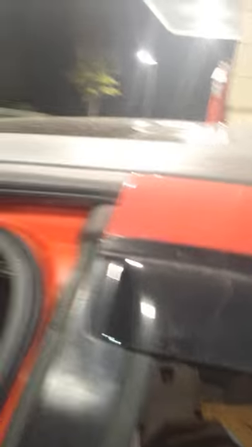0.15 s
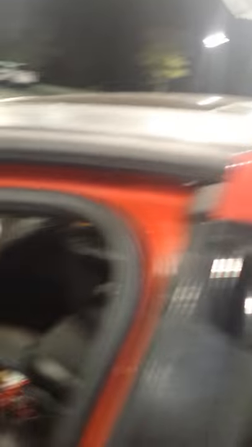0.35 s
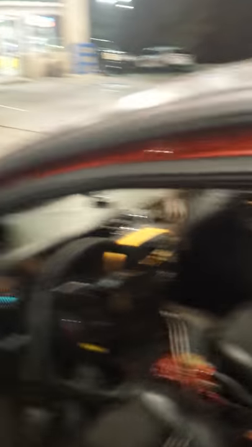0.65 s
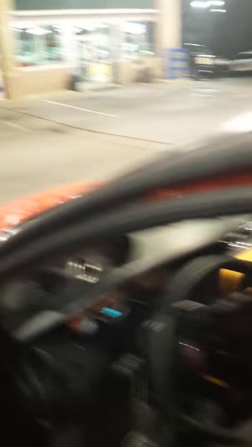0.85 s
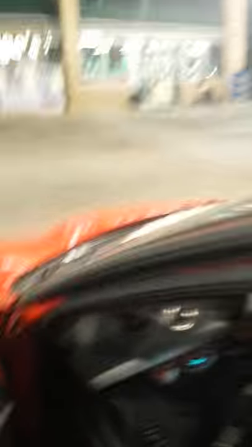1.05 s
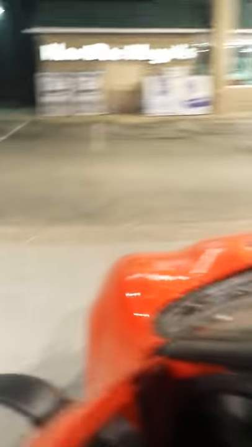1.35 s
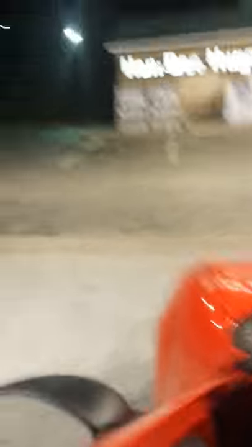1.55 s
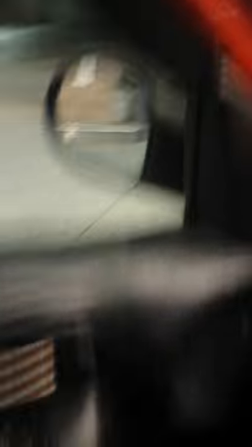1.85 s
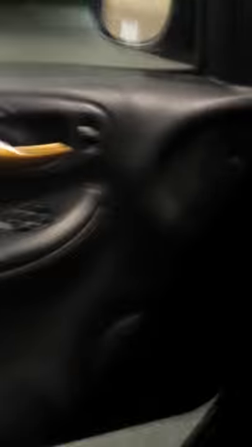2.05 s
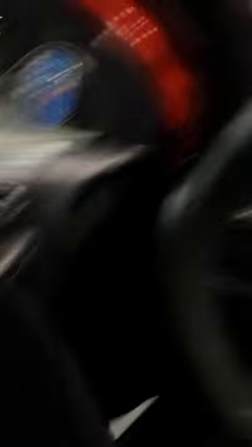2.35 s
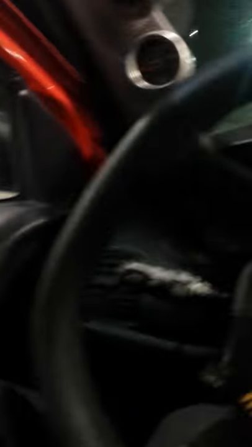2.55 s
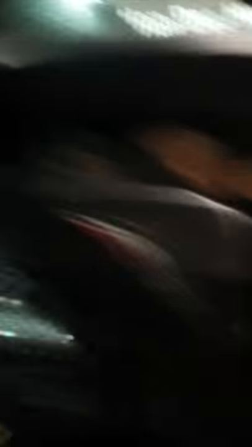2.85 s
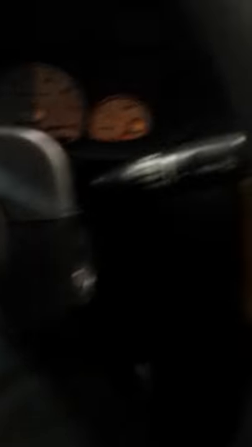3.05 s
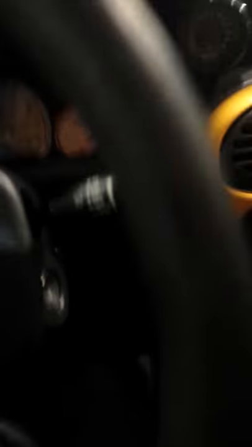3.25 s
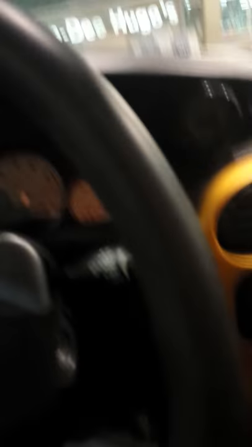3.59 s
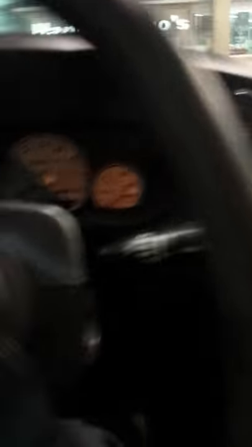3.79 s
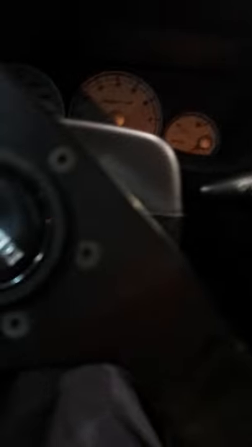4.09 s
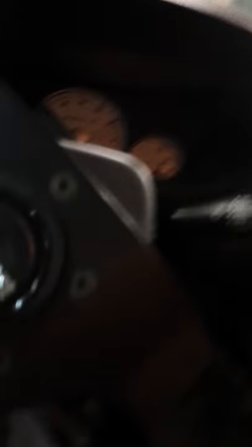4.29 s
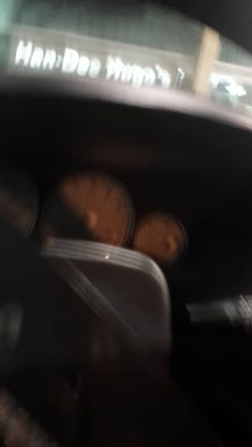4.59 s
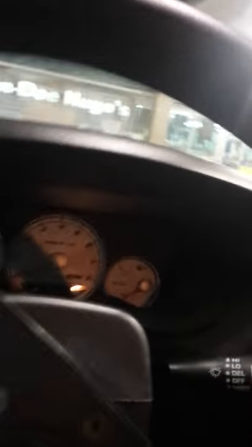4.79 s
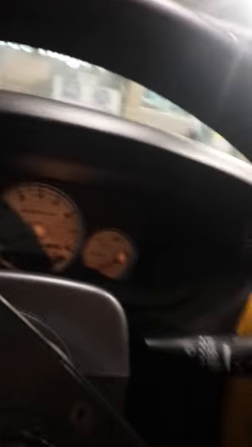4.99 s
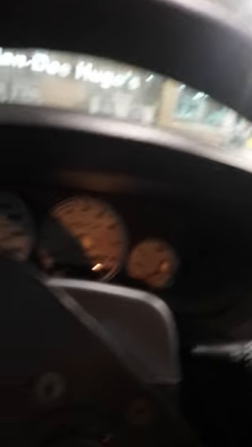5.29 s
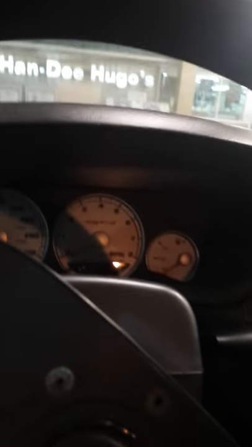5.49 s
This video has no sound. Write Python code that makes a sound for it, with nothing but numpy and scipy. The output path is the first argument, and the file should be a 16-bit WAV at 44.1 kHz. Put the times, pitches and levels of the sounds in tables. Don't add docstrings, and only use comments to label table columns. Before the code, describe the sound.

On a quiet forecourt at night, a car handle clunks open near the microphone. Air rumble, faint distant traffic and cloth rustle accompany climbing in. A loud, bright snap with a short rattle comes midway, then scattered clicks, and the door slams with a deep thump and rattling bounce. Trim buzzes briefly, the cabin goes hushed, and fingers tick and pop on the recorder.

```python
import sys
import numpy as np
from scipy import signal
from scipy.io import wavfile

SR = 44100
rng = np.random.default_rng(int(sys.argv[2]) if len(sys.argv) > 2 else 0)


def materialize(psi):
    bounded = np.clip(np.atleast_2d(psi).T, -1, 1)
    quanta = np.round(bounded * 32767).astype(np.int16)
    wavfile.write(sys.argv[1], SR, quanta)


def linear_from_db(decibels):
    return 10 ** (np.asarray(decibels, float) / 20)


N = 248283


def rms_one(x):
    return x / np.sqrt(np.mean(x ** 2) + 1e-20)


def in_time(rows):
    s, *columns = np.transpose(rows)
    return [np.interp(np.arange(N) / SR, s, c) for c in columns]


def gate(rows):
    t0, t1 = rows[0][0], rows[-1][0]
    return np.interp(np.arange(N) / SR, [t0, t0 + 0.0038, t1 - 0.003, t1], [0, 1, 1, 0])


def at_hz(points, hz):
    curve_hz, values = np.array(points)[:, 0], np.array(points)[:, 1]
    return np.interp(np.log(hz), np.log(curve_hz), values)


def sides(pan_db):
    g = linear_from_db(pan_db)
    return np.array([2 * g / (1 + g), 2 / (1 + g)])


def filtered(x, order, hz, kind="low"):
    return signal.sosfilt(signal.butter(order, hz, kind, fs=SR, output="sos"), x)


def drift(rate):
    r = np.exp(-80 * np.pi * rate / SR)
    noise = rng.standard_normal(N // 40 + 2002)
    slow = signal.lfilter([1], [1, -2 * r, r * r], noise)[2000:]
    return np.interp(np.arange(N) / 40, np.arange(len(slow)), rms_one(slow))


def resonance(x, hz, width):
    r = np.exp(-np.pi * width / SR)
    poles = [1, -2 * r * np.cos(2 * np.pi * hz / SR), r * r]
    return signal.lfilter([(1 - r * r) / 2, 0, (r * r - 1) / 2], poles, x)


def grains(per_s, spread_db):
    strength = linear_from_db(spread_db * np.minimum(rng.exponential(1, (2, N)), 5))
    sign = rng.choice([-1, 1], (2, N))
    return strength * sign * (rng.random((2, N)) < per_s / SR) + 1e-9


def coloured(source, spectrum, patchy_db, inside=None):
    # f/Hz, likeness (-1 to 1)
    likeness = [(60, 0.8), (240, 0.86), (950, 0.01), (3770, -0.13), (15000, 0.033)]
    inside = spectrum if inside is None else inside
    out, together = 0, drift(7.1)
    shut = np.interp(np.arange(N) / SR, [3.9, 4.8], [0, 1])
    bottom, top = spectrum[0][0], spectrum[-1][0]
    edges = bottom * 2 ** np.arange(0, np.log2(top / bottom) + 0.3, 0.5)
    for k, (low, high) in enumerate(zip(edges, np.minimum(edges[1:], 0.45 * SR))):
        shifted = np.roll(source, 5000 * (k % 2), axis=1)
        mid, side = filtered(shifted, 2, [low, high], "band")
        hz = np.sqrt(low * high)
        alike = np.clip(at_hz(likeness, hz), -1, 1)
        level_db = (1 - shut) * at_hz(spectrum, hz) + shut * at_hz(inside, hz)
        gain = linear_from_db(level_db + patchy_db * (0.84 * together + 0.28 * drift(8.3)))
        out = out + gain * (np.sqrt(1 + alike) * mid + np.sqrt(1 - alike) * side * [[1], [-1]])
    return rms_one(out)


def add(out, s, burst):
    at = round(s * SR)
    out[:, at:at + burst.shape[1]] += burst[:, :N - at]


def clicks(rows, broad_db, alike, body_hz, swell, presence=2.4, spike=0.66, spike_s=0.0042,
           width=0.19, cut_hz=10500):
    out, t = np.zeros((2, N)), np.arange(8192) / SR
    noises = rng.standard_normal((len(rows), 2, len(t)))
    for (s, peak_db, hz, t60, pan_db), (mid, side) in zip(rows, noises):
        dying = linear_from_db(-60 * np.maximum(t - swell, 0) / max(t60, 0.002))
        shape = np.minimum(t / swell, 1) ** 2 * dying
        shape = shape * (1 + spike * np.exp(-np.abs(t - swell) / spike_s))
        pair = (alike * mid + (1 - alike) * side * [[1], [-1]]) * shape
        body = resonance(pair, body_hz, 3.24 * body_hz)
        microphone = 0.93 * resonance(pair, 5650, 1170) + 0.39 * resonance(pair, 4200, 1300)
        wide = body + presence * microphone
        burst = filtered(resonance(pair, hz, width * hz) + linear_from_db(broad_db) * wide, 3, cut_hz)
        level = linear_from_db(peak_db) / np.abs(burst.mean(0)).max()
        add(out, s - swell, level * sides(pan_db)[:, None] * burst)
    return out


def knocks(rows, soft_cycles):
    out, t = np.zeros((2, N)), np.arange(16384) / SR
    noises = rng.standard_normal((len(rows), len(t)))
    for (s, peak_db, hz, t60, pan_db, rough), noise in zip(rows, noises):
        shape = (1 - np.exp(-t * hz / soft_cycles)) * linear_from_db(-60 * t / max(t60, 0.004))
        shaken = rms_one(resonance(resonance(noise, hz, 0.26 * hz), hz, 2.4 * hz))
        burst = shape * ((1 - rough) * np.sin(2 * np.pi * hz * t) + rough * shaken)
        add(out, s, linear_from_db(peak_db) * sides(pan_db)[:, None] * burst / np.abs(burst).max())
    return out


def surroundings():
    # f/Hz, level/dB (per Hz)
    rumble_colour = [(15, -57), (25, -16.5), (108, 3), (167, -5), (220, -2), (285, -10.5), (340, -11),
                     (440, -26), (750, -120)]
    traffic_colour = [(150, -46), (250, -3.5), (548, -7), (897, -7.5), (2250, -18), (2400, -23),
                      (3120, -46.5), (5280, -120)]
    rustle_colour = [(1000, -22), (1700, -5), (2930, -11), (3310, 0), (4550, -1), (6880, 3), (11300, -20),
                     (14400, -2.5), (16000, -32)]
    rustle_colour_inside = [(1000, -65.5), (1700, -37), (2380, -5), (3310, -6), (7210, 6), (14700, -26.5),
                            (16000, -33)]
    # t/s, level/dB
    openness = [(0.0, -45.5), (0.41, -45), (1.14, -45), (1.93, -40.5), (2.18, -41), (2.39, -54),
                (2.8, -58.5), (3.22, -45.5), (3.4, -47.5), (3.93, -55), (4.11, -67.5), (4.48, -57.5),
                (4.74, -53.5), (5.29, -62), (5.63, -56)]
    # t/s, level/dB
    movement = [(0.0, -53), (0.12, -40), (0.41, -40), (0.52, -50.5), (1.14, -43), (1.5, -38), (2.18, -37.5),
                (2.39, -45.5), (2.67, -49), (3.11, -47.5), (3.25, -31), (3.38, -40.5), (3.93, -49.5),
                (4.1, -61.5), (4.74, -52), (5.04, -50.5), (5.19, -58.5), (5.46, -45)]
    # t/s, left-right level/dB
    facing = [(0.15, -3), (1.2, 2.5), (1.5, 10.5), (3.3, 2), (4.05, 10), (4.12, 13), (4.48, -14),
              (4.54, -20), (4.8, -11)]
    (traffic_db,), (rustle_db,), (pan_db,) = in_time(openness), in_time(movement), in_time(facing)
    start, edge_s, gust_peak_db = 0.0084, 0.094, 7.5
    end = start + 0.54
    gust_db, = in_time([(start, 0), (start + edge_s, gust_peak_db), (end - edge_s, gust_peak_db), (end, 0)])
    rumble_db = -45 + 0.93 * (traffic_db + 48.5) + gust_db
    rustle_db = rustle_db + 0.82 * drift(4.7)
    rumble = linear_from_db(rumble_db) * coloured(rng.standard_normal((2, N)), rumble_colour, patchy_db=3.5)
    traffic = linear_from_db(traffic_db) * coloured(rng.standard_normal((2, N)), traffic_colour, patchy_db=2.0)
    cloth = coloured(grains(9000, 3.1), rustle_colour, patchy_db=1.8, inside=rustle_colour_inside)
    return rumble + (traffic + linear_from_db(rustle_db) * cloth) * sides(np.clip(0.29 * pan_db, -9, 9))


def self_noise():
    return linear_from_db(-60) * rms_one(filtered(rng.standard_normal((2, N)), 1, 5200, "high"))


def sleeve():
    # t/s, level/dB
    swish = [
        (0.0, -60.5),
        (0.302, -50),
        (0.422, -54),
        (0.55, -89),
    ]
    airy = filtered(rng.standard_normal((2, N)), 2, [9500, 15800], "band")
    return gate(swish) * linear_from_db(in_time(swish)[0] + 4.5) * rms_one(airy)


def thuds():
    # t/s, peak level/dB, pitch f/Hz, decay t60/s, left-right level/dB
    dull_knocks = [(0.132, -21, 94, 0.14, -19), (0.292, -21.5, 503, 0.24, 3), (0.306, -17, 376, 0.13, 7),
                   (0.3, -14.5, 286, 0.13, 3.5), (0.691, -25, 1100, 0.04, 22),
                   (0.803, -28.5, 114, 0.31, 2.5), (1.243, -29, 228, 0.19, 3.5),
                   (1.692, -24.5, 850, 0.093, 24), (1.75, -21.5, 129.6, 0.21, 9),
                   (1.77, -14.5, 131, 0.063, 5), (1.799, -23, 172, 0.14, 5), (1.863, -15.5, 115, 0.077, 31),
                   (2.058, -16, 930, 0.078, -12), (2.066, -33, 1100, 0.17, -4),
                   (2.184, -24, 101, 0.22, -33), (2.277, -19, 166.6, 0.24, 2.5),
                   (2.93, -30.5, 193, 0.072, 2.5), (2.943, -33, 382, 0.047, 6),
                   (3.077, -16, 508, 0.079, 10), (3.099, -18, 326, 0.25, 16),
                   (3.507, -29.5, 93, 0.049, -31), (3.553, -33.5, 112.3, 0.09, -28),
                   (4.84, -38.5, 233, 0.078, 6), (4.885, -32.5, 226, 0.06, 5)]
    rough_clunks = [(0.297, -21.5, 784, 0.15, 14), (0.315, -25.5, 740, 0.19, 7),
                    (0.693, -27, 926, 0.049, -2), (0.802, -30, 492, 0.083, 3), (1.754, -25, 410, 0.055, 7),
                    (2.284, -27, 433, 0.046, -15), (3.147, -16, 487, 0.13, 10),
                    (3.166, -28, 664, 0.081, 9.5), (3.211, -18, 453, 0.062, 10),
                    (3.287, -36, 610, 0.054, 3), (0.692, -29, 517, .05, 5), (2.057, -21, 560, .06, 9),
                    (2.069, -18.5, 1060, 0.05, -5), (2.082, -31, 994, 0.046, -7.5),
                    (2.108, -25.5, 1005, 0.13, -4), (4.477, -27.5, 800, 0.019, -20),
                    (4.785, -41, 280, 0.044, 13)]
    blows = [(*row, 0.42) for row in dull_knocks] + [(*row, 0.67) for row in rough_clunks]
    return knocks(blows, soft_cycles=0.15)


def hard_contacts():
    # t/s, peak level/dB, colour f/Hz, decay t60/s, left-right level/dB
    cracks = [(0.140, -27, 13000, 0.033, -12), (0.691, -32.5, 2600, 0.059, 9), (0.694, -30.5, 4340, .04, 4),
              (1.529, -28, 6500, .03, 10), (1.5366, -16.5, 6800, 0.023, 19), (1.692, -30, 6430, 0.18, 6),
              (2.052, -8, 6000, .06, -4), (2.0555, 2, 4500, 0.041, 7), (2.0565, -10, 2700, .07, 7),
              (2.065, -25, 7060, 0.051, 2), (2.1035, -6, 6370, .012, -4), (2.1083, -12, 7150, .012, -4),
              (2.1432, -17, 7100, .015, 1), (3.111, -16.5, 1610, .04, -6), (3.152, -26, 1610, .05, 5),
              (3.1985, -15.5, 3280, .06, 7), (3.2005, -12, 7000, .05, -2), (3.211, -14.5, 6000, .04, 2),
              (3.2125, -18.5, 3300, 0.065, 2), (3.2225, -18, 3320, .08, 8), (3.124, -19, 4800, .05, -1),
              (3.172, -15, 3000, 0.074, 5), (3.223, -20, 7000, 0.033, 0), (3.26, -25, 6900, .06, -3),
              (3.274, -21, 6000, .04, 1), (3.286, -29, 2000, .04, 6), (3.2985, -28, 3450, .05, 5),
              (1.10, -36, 5000, 0.17, 0), (2.565, -42, 5000, .2, 2), (2.6945, -37, 5200, 0.027, 3),
              (2.9745, -30, 5500, .03, 1), (3.0795, -22, 6500, .15, 3), (3.086, -23.5, 3500, 0.11, 5),
              (5.025, -38.5, 5000, 0.17, -3), (5.2815, -26, 7000, .03, -4)]
    return clicks(cracks, broad_db=-34, alike=0.69, body_hz=3000, swell=0.0003, presence=1.0,
                  spike=1.3, spike_s=0.00051, width=0.2, cut_hz=10000)


def latch_and_keys():
    # t/s, peak level/dB, decay t60/s, left-right level/dB
    latch_snaps = [
        (0.2933, -9, 0.089, 7.5),
        (0.6932, -35, 0.072, 19),
        (3.213, -18, 0.08, 4),
        (3.1985, -13.5, 0.15, 3),
    ]
    key_clicks = [(1.3099, -30, 0.13, 8), (1.8336, -22, 0.0098, 10), (2.0562, 0, 0.039, 1),
                  (2.3479, -29.5, 0.085, 2), (2.4057, -26.5, 0.42, 2.5), (2.445, -30, 0.07, 0),
                  (2.6943, -34, 0.04, 1), (2.8207, -28, 0.072, 0), (2.9312, -34.5, 0.047, 2),
                  (2.9734, -33.5, 0.061, -4), (3.0794, -22, 0.1, 3), (3.0994, -10.5, 0.38, -1),
                  (3.1656, -15, 0.17, 1), (3.3727, -23, 0.11, -1), (3.4237, -29, 0.053, -4),
                  (3.4674, -30.5, 0.04, 3), (3.5098, -27.5, 0.074, 1), (3.5892, -26, 0.077, 1),
                  (3.6334, -27.5, 0.11, 3), (4.8718, -32, 0.027, 9), (5.335, -39, 0.057, -1)]
    snaps = [(s, db, 3200, t60, pan_db) for s, db, t60, pan_db in latch_snaps]
    snaps += [(s, db, 6340, t60, pan_db) for s, db, t60, pan_db in key_clicks]
    return clicks(sorted(snaps), broad_db=-12.5, alike=0.47, body_hz=1100, swell=0.0023)


def loose_parts():
    # t/s, peak level/dB, colour f/Hz, decay t60/s, left-right level/dB
    chatter = [(0.4086, -35, 7040, 0.069, -7), (1.592, -26.5, 5950, 0.42, 21), (1.9885, -25, 6600, 0.2, -2),
               (2.1035, -6.5, 6150, 0.09, 2), (2.1432, -15, 6460, 0.24, -0.5),
               (3.1226, -15.5, 5750, 0.17, 6), (3.218, -14, 6800, 0.044, -5),
               (3.2988, -20.5, 6400, 0.15, -2), (3.3365, -13, 6030, 0.073, 2),
               (3.385, -29, 6740, 0.098, 12), (3.7722, -31.5, 4740, 0.056, 3),
               (4.8934, -22, 7340, 0.077, -4), (5.281, -27.5, 7000, 0.1, 0)]
    return clicks(chatter, broad_db=-13.5, alike=0.46, body_hz=1700, swell=0.011)


def hinge():
    # t/s, peak level/dB, pitch f/Hz, decay t60/s
    squeaks = [
        (1.874, -20, 12300, .03),
        (1.885, -12, 12600, 0.023),
        (4.741, -57, 1200, .6),
        (4.80, -53.5, 1160, 0.34),
    ]
    out, t = np.zeros((2, N)), np.arange(6000) / SR
    for s, peak_db, hz, t60 in squeaks:
        wobble = 0.33 * np.cumsum(rng.standard_normal(len(t))) * hz / SR
        shape = (1 - np.exp(-t / 0.0047)) * linear_from_db(peak_db - 60 * t / t60) * (1 - t / t[-1])
        tone = np.sin(2 * np.pi * hz * t + wobble) * shape
        add(out, s, tone * sides(7.0)[:, None])
    return out


def door():
    # t/s, rattle level/dB
    bounces = [
        (3.079, -23),
        (3.099, -13),
        (3.125, -40),
        (3.164, -16.5),
        (3.197, -26.5),
        (3.218, -38),
        (3.283, -22.5),
    ]
    # t/s, peak level/dB, pitch f/Hz, decay t60/s
    air_pushes = [
        (3.105, -17.5, 61, 0.35),
        (3.127, -17, 130, 0.091),
        (3.1478, -3.5, 120, 0.04),
        (3.156, -20, 57.5, 0.44),
        (3.177, -7, 120, 0.14),
        (3.223, -21, 128.6, 0.28),
        (3.1634, -10.5, 95, 0.03),
    ]
    # f/Hz, width/Hz, level/dB
    panel_modes = [(326, 99, -1), (480, 75, -0.5), (690, 39, -5.5), (1200, 72, -8), (1600, 580, -17.5)]
    # f/Hz, level/dB (per Hz)
    rattle_colour = [(880, -45), (1500, 1.5), (1870, -6), (3310, 3), (4970, -12), (7030, -18), (8400, -20),
                     (14500, -20), (16000, -35)]
    attack_s, t60_s = 0.0013, 0.1
    settle_db, settle_t60_s = -11, 0.71
    t, power = np.arange(0, N, 32) / SR, 0
    for s, db in bounces:
        since = np.maximum(t - s, 0)
        fast = linear_from_db(db - 60 * since / t60_s)
        shiver = linear_from_db(db + settle_db - 60 * since / settle_t60_s)
        power = power + np.minimum(since / attack_s, 1) ** 2 * (fast ** 2 + shiver ** 2)
    panel_curve_db = 6 - 18.5 * (t - bounces[0][0])
    shake, panel_db = in_time(np.transpose([t, np.sqrt(power), panel_curve_db]))
    jolts = filtered(grains(670, 4.3), 2, 1800)
    panel = 0
    for k, (hz, width, db) in enumerate(panel_modes):
        panel = panel + linear_from_db(db) * resonance(jolts, hz, 2.56 * width) * (-1) ** k
    panel = panel[0] + 0.63 * panel[1] * [[1], [-1]]
    rattle = coloured(grains(500, 3.6), rattle_colour, patchy_db=4.5)
    shaking = linear_from_db(panel_db - 4.0) * rms_one(panel) + linear_from_db(-3.5) * rattle
    booms = [(*row, 1.2, 0.16) for row in air_pushes]
    return shake * shaking + knocks(booms, soft_cycles=0.11)


def trim():
    # t/s, peak level/dB, hardness/dB per octave
    trim_hits = [(3.475, -25.5, -18), (3.508, -29, 9.5), (3.59, -33, -5), (3.606, -28, -27),
                 (3.633, -44, -7), (3.675, -30, 7), (3.705, -32, 8.5), (3.727, -34, 11), (3.738, -27.5, 0),
                 (3.764, -31.5, 1), (3.775, -34, 6.5), (3.828, -30.5, 4.5)]
    # f/Hz, level/dB, decay t60/s
    trim_modes = [(467, 5.5, 0.079), (808, -6.5, 0.09), (1200, -7, 0.021), (1755, -17, 0.16),
                  (2120, -17, 0.072)]
    out, t = np.zeros((2, N)), np.arange(4096) / SR
    noises = rng.standard_normal((len(trim_hits), len(t)))
    for (s, peak_db, hard_db), noise in zip(trim_hits, noises):
        shake = noise * t * np.exp(-t / 0.0021)
        burst = 0
        for hz, db, t60 in trim_modes:
            octaves = np.log2(hz / trim_modes[0][0])
            burst = burst + linear_from_db(db + hard_db * octaves) * rms_one(resonance(shake, hz, 2.7 / t60))
        add(out, s, linear_from_db(peak_db - 0.5) * sides(5.3)[:, None] * burst / np.abs(burst).max())
    return out


def fingers():
    # t/s, peak level/dB, colour f/Hz, left-right level/dB
    tick_rows = [(4.134, -32.5, 4500, -21), (4.145, -60, 5000, -6), (4.157, -46, 1610, -15),
                 (4.1675, -30, 3150, -31), (4.185, -57, 4500, -13), (4.1978, -22, 2010, -29),
                 (4.233, -51, 2500, -15), (4.2432, -38, 3000, -25), (4.478, -19.5, 6300, -32),
                 (4.495, -37, 1300, 10), (4.5069, -36, 3000, 14), (4.514, -31, 1880, 14),
                 (4.5176, -27, 6130, 12), (4.5226, -25, 2950, 19), (4.526, -29, 1500, 14),
                 (4.530, -32, 2600, 14), (4.535, -31, 2600, 16), (4.537, -25, 5500, 14),
                 (4.542, -12, 4840, 32), (4.5455, -36, 3500, 16), (4.548, -37, 1500, 16),
                 (4.5525, -39, 6000, 10), (4.558, -23, 4730, 11), (4.5685, -34, 6000, 8),
                 (4.5725, -23, 7000, -1), (4.574, -27, 5300, 0), (4.582, -31, 2200, 21),
                 (4.603, -30, 2100, 14), (4.609, -38, 2000, 19), (4.688, -33, 1500, 20),
                 (4.694, -23, 4860, -8), (5.11, -35, 1620, -12), (5.1282, -46, 6990, -1)]
    # t/s, peak level/dB, pitch f/Hz, decay t60/s, left-right level/dB
    tap_rows = [(4.135, -16.5, 775, 0.01, -17), (4.1578, -27, 586, 0.0084, -15),
                (4.168, -33, 690, 0.017, -16), (4.196, -32.5, 585, 0.0047, -18),
                (4.246, -43, 1060, 0.021, -12), (4.522, -24.5, 595, 0.017, 15),
                (4.5421, -22, 245, 0.015, 21), (4.559, -23.5, 207, 0.026, 30),
                (4.571, -26.5, 217, 0.13, 35), (4.603, -25.5, 306, 0.016, 32),
                (4.6104, -22.5, 330, 0.012, 30), (4.569, -34, 300, 0.026, 30)]
    # t/s, peak level/dB, pitch f/Hz, decay t60/s
    pop_rows = [
        (4.6875, -16.5, 388, 0.051),
        (4.6915, -9.5, 340, 0.016),
        (4.6932, -9, 1400, 0.0066),
        (4.6962, -10, 278, 0.026),
        (4.6925, -15, 653, 0.03),
        (4.694, -16.5, 1980, 0.016),
    ]
    # t/s, length/s, peak level/dB, brightness/dB, left-right level/dB
    rub_rows = [
        (4.242, 0.0094, -38.5, -1, -30),
        (4.252, 0.016, -36.5, 13, -37),
        (4.354, 0.082, -37.5, -1, -24),
        (4.504, 0.133, -36.5, -1, 29),
        (5.216, 0.09, -68, 31.5, -7),
    ]
    slips = filtered(grains(9000, 1.4)[0], 2, 9000)
    dull = rms_one(resonance(resonance(slips, 210, 240), 274, 240))
    middle = resonance(slips, 900, 290) + 0.18 * resonance(slips, 1750, 530)
    middle = rms_one(resonance(middle, 1000, 7100))
    bright = rms_one(resonance(slips, 6900, 1000) + 0.32 * resonance(slips, 4200, 1700))
    ticks = [(s, db, hz, 0.0074, pan_db) for s, db, hz, pan_db in tick_rows]
    taps = [(*row, 0.22) for row in tap_rows]
    taps += [(*row, 29, 0.12) for row in pop_rows]
    out = knocks(taps, soft_cycles=0.45)
    out = out + clicks(ticks, broad_db=-1.0, alike=0.46, body_hz=826, swell=0.000223, presence=0.16,
                       spike=1.5, spike_s=0.00023, width=0.37, cut_hz=7100)
    for s, length, peak_db, tilt_db, pan_db in rub_rows:
        rise = min(0.038, 0.7 * length)
        rows = [(s, -707 * rise), (s + rise, 0), (s + length, -278.5 * (length - rise))]
        press_db, = in_time(rows)
        skin = linear_from_db(0.97 * press_db - tilt_db) * dull
        skin = skin + linear_from_db(press_db) * (middle + linear_from_db(tilt_db - 8.5) * bright)
        out = out + sides(pan_db)[:, None] * gate(rows) * linear_from_db(peak_db) * skin
    return filtered(out, 2, 110, "high")


def scene():
    background = surroundings() + sleeve()
    contacts = thuds() + hard_contacts() + latch_and_keys() + loose_parts()
    return background + contacts + hinge() + door() + trim() + fingers()


def top_cut(x):
    return signal.sosfilt(signal.butter(12, 16170, fs=SR, output="sos"), x)


def record(dry):
    thin = filtered(dry + self_noise(), 2, 27, "high")
    overloaded = np.clip(thin, -0.82, 0.82)
    top = signal.cheby2(10, 60, 16500, fs=SR, output="sos")
    return top_cut(signal.sosfilt(top, overloaded))


dry = scene()
out = record(dry)
materialize(out)
```